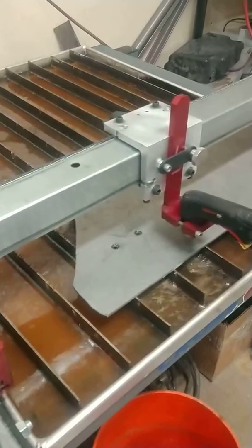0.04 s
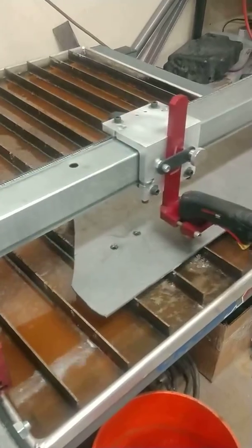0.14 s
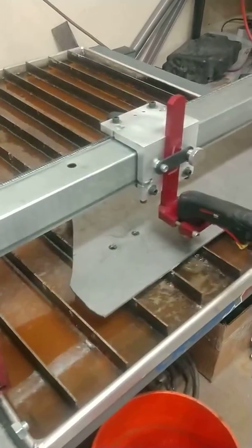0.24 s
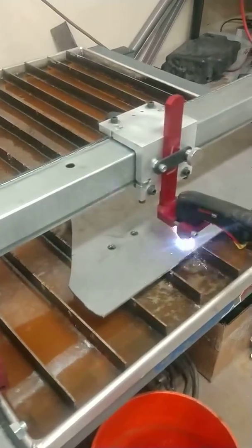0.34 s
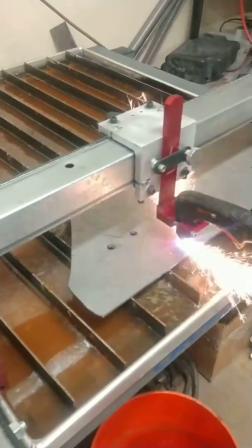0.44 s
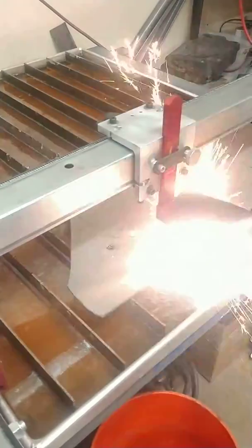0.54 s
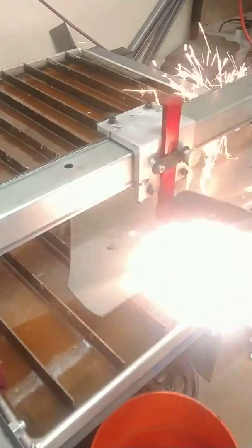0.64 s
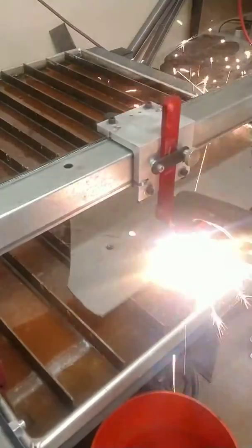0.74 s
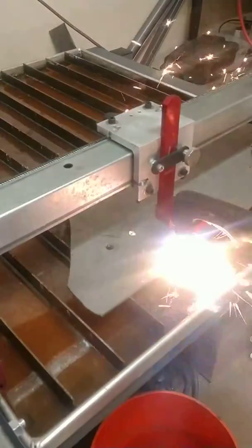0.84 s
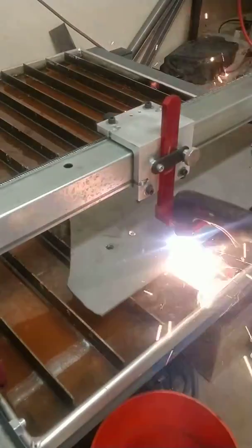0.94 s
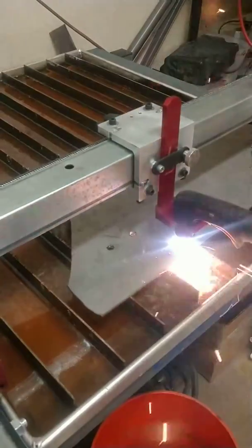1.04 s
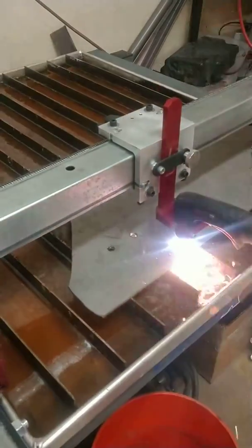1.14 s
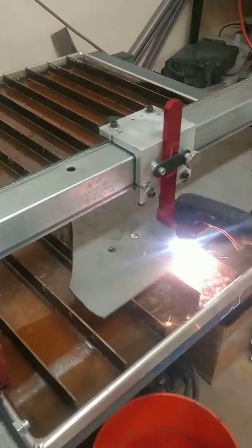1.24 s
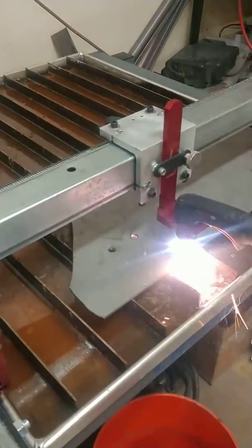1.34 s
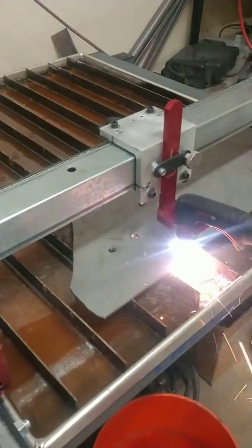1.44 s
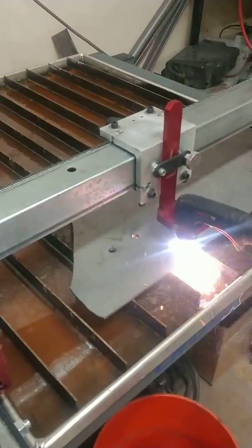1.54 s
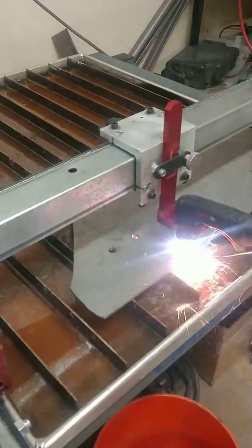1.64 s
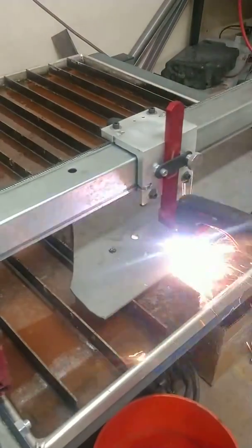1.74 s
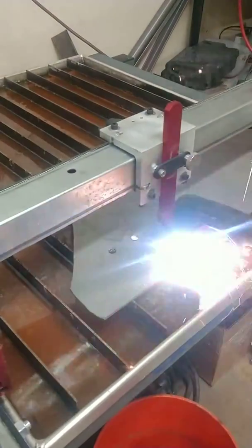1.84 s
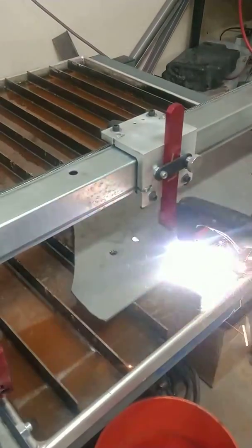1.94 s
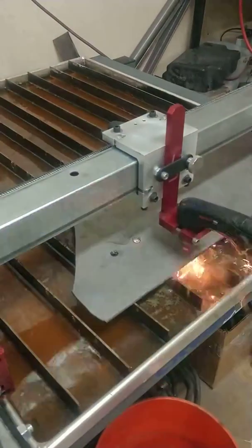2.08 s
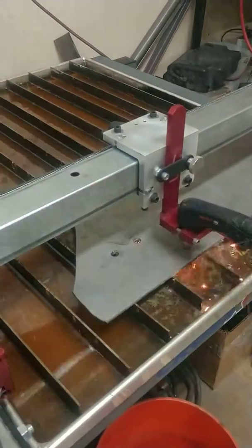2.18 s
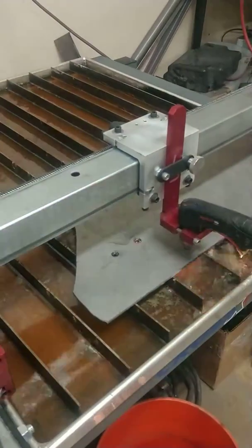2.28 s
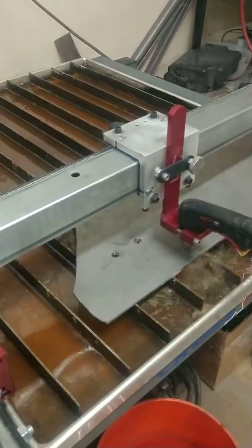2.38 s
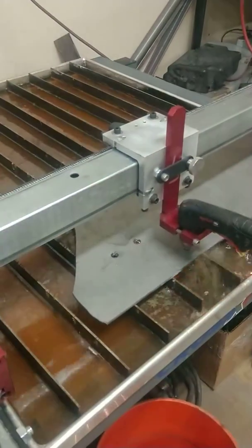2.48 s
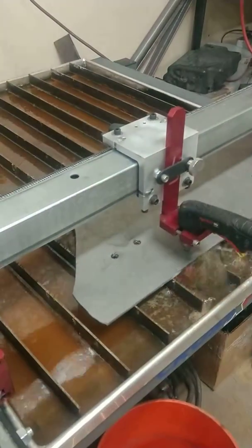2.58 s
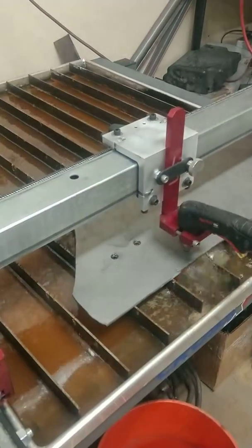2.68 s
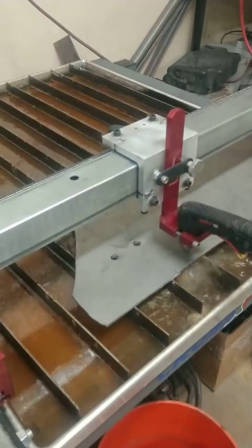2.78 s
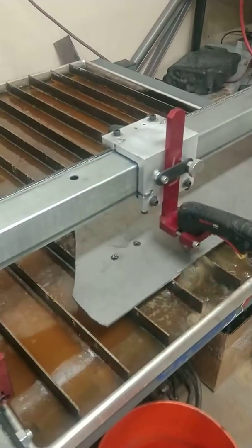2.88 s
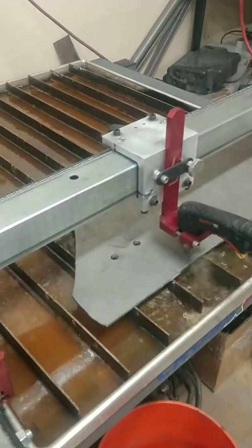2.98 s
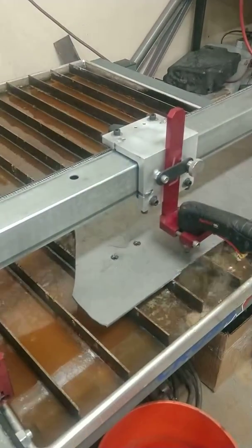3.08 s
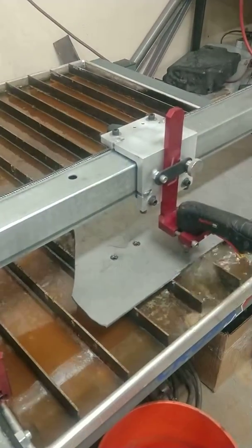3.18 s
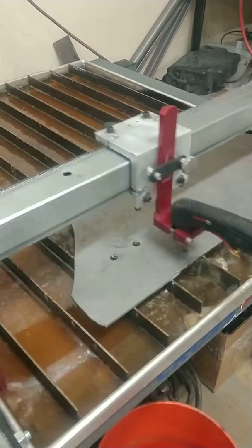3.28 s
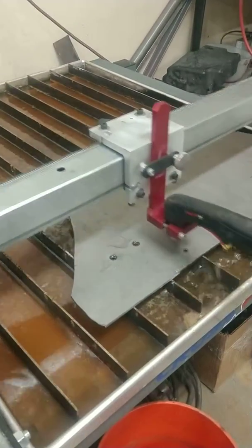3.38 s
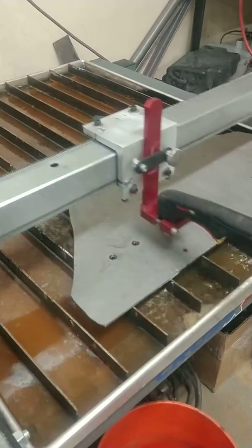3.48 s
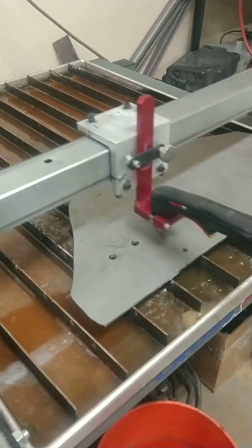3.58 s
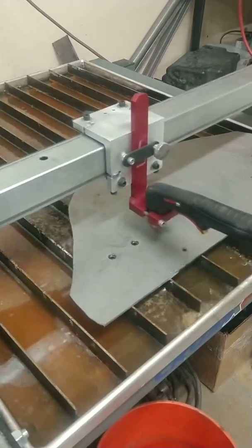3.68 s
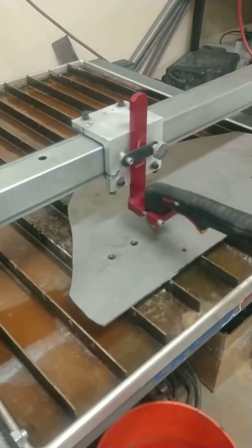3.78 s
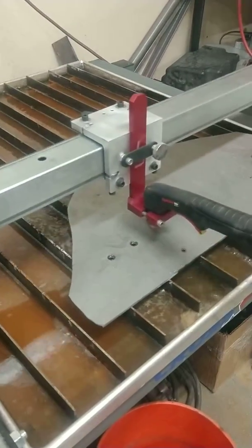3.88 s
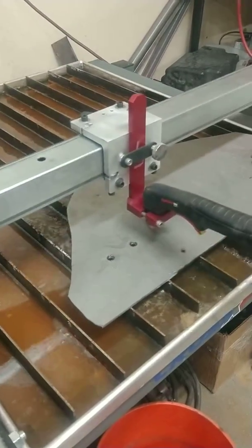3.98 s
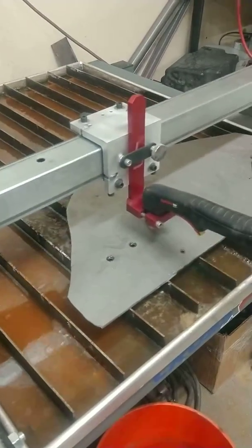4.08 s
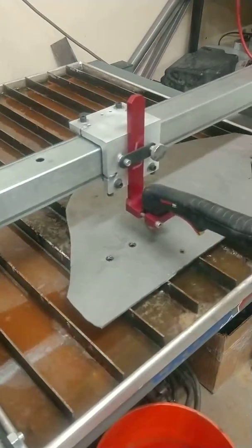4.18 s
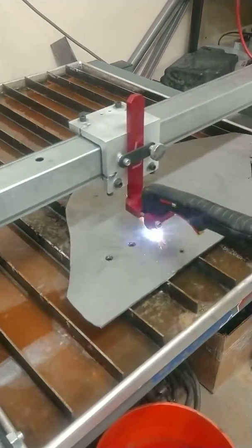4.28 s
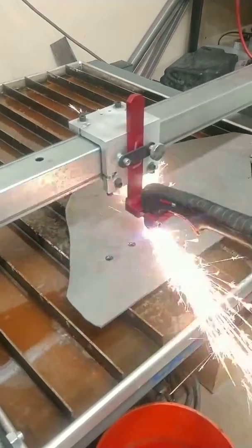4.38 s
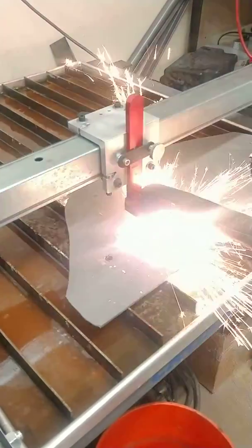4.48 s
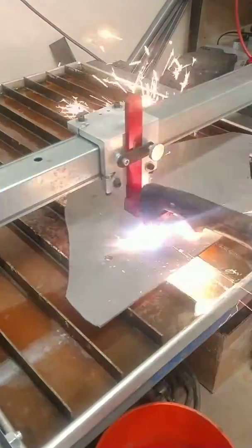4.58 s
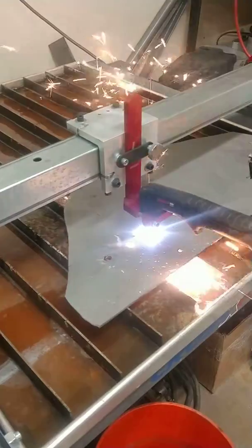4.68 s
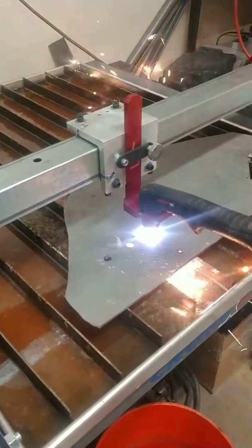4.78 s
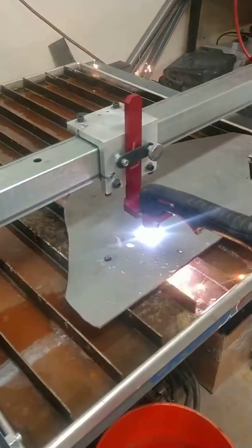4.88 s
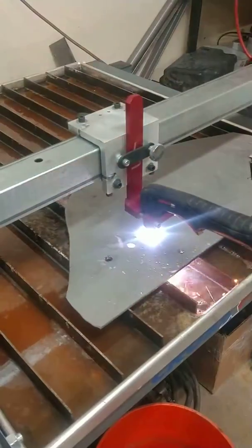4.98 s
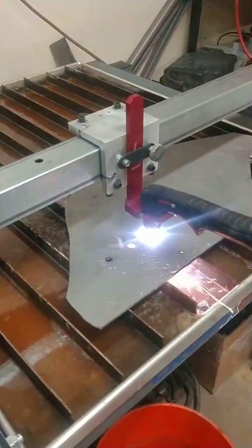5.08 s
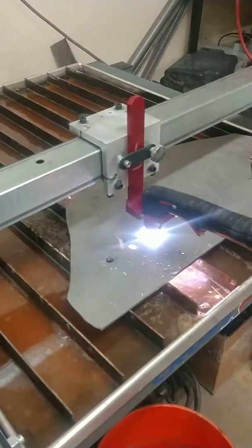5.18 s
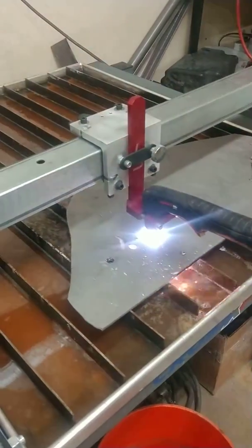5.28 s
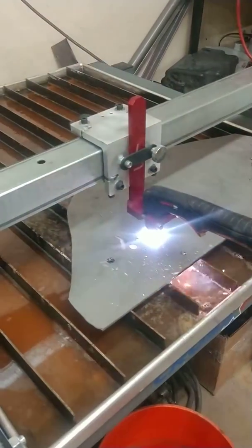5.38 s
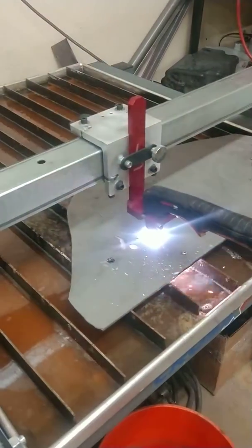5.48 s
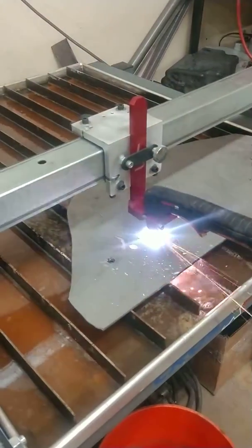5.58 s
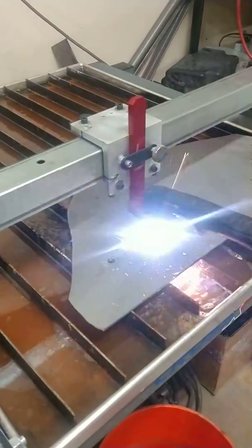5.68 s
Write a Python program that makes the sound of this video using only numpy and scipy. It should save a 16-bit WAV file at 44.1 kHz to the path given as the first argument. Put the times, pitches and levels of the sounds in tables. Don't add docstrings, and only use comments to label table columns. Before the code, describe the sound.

A plasma torch works over a water-filled cutting table, heard close in stereo in a workshop. Bright air hiss opens the scene and bleeds away from about 0.15 s, with a soft gulp, leaving low fan rumble, faint hiss and wavering mains hum. A valve ticks at 0.44 s; the arc cracks on at 0.49 s with a burst of spray and a tiny rising whistle. A lumpy low roar and sizzling hiss continue, the water churning into ringing gurgles from about 1.1 s, with a loud gulp at 1.27 s and a smaller one at 1.5 s. At 2.18 s the arc snaps out. Air blows on, bubbling until about 3.4 s, then hissing more cleanly until it shuts off at 4.08 s with small gulps. A tick at 4.38 s and a crack at 4.43 s start the second whistle and roar. Strong, hollow, pitched gurgling surges from 5 s onward, still cutting at the end.

```python
import sys
import numpy as np
from scipy import signal
from scipy.fft import rfft
from scipy.io import wavfile
from scipy.ndimage import uniform_filter1d

SR = 44100
rng = np.random.default_rng(int(sys.argv[2]) if len(sys.argv) > 2 else 0)


def natural_amplitude(level_db):
    exponent = np.asarray(level_db, float) / 20
    return 10 ** exponent


def pcm_store(signal):
    levels = np.round(np.clip(np.atleast_2d(signal), -1, 1) * 32767)
    wavfile.write(sys.argv[1], SR, levels.astype(np.int16).T)


N = 252693

# start_s [s], peak_db [dB], length_ms [ms]
ARC_CRACKS = [
    (0.4882, -10, 1),
    (2.182, -5, 0.44),
    (4.4283, -9.5, 0.95),
]


def evened(x):
    return x / np.sqrt(np.mean(x ** 2) + 1e-20)


def read(points, hz, col=1):
    table = np.array(points)
    return np.interp(np.log(hz + 1), np.log(table[:, 0] + 1), table[:, col])


def add(mix, start_s, sound):
    part = mix[round(start_s * SR):][:len(sound)]
    part += sound[:len(part)]


def band_even(x, lo_hz, hi_hz):
    hz = np.fft.rfftfreq(len(x), 1 / SR)
    band = rfft(x)[(hz > lo_hz) & (hz < hi_hz)]
    return x * len(x) / np.sqrt(2 * np.sum(abs(band) ** 2))


def smooth_patches(noise, bins, frames):
    return evened(uniform_filter1d(uniform_filter1d(noise, size=bins, axis=0), size=frames, axis=1))


def rush(spectrum, patchy_db, flicker_db, size):
    frames, hz = 4 * N // size + 5, np.fft.rfftfreq(size, 1 / SR)
    a, b, patch = rng.standard_normal((frames, len(hz), 3)).T
    patch = smooth_patches(patch, bins=size // 64, frames=8192 // size)
    flicker = evened(uniform_filter1d(rng.standard_normal(frames), size=3))
    level_db = read(spectrum, hz)[:, None] + patchy_db * patch + flicker_db * flicker
    return signal.istft((a + 1j * b) * natural_amplitude(level_db), nperseg=size, noverlap=size * 3 // 4)[1][:N]


def resonate(x, hz, width):
    turn = np.exp(2j * np.pi * np.cumsum(hz) / SR)
    r = np.exp(-np.pi * width / SR)
    return 2 * (turn * signal.lfilter([1 - r], [1, -r], x / turn)).real


def control(name):
    # start_s [s], air_db [dB], spray_db [dB above the air], churn_db [dB]
    phases = [
        [(0.0, -27, -18, -44), (0.15, -31, -33, -70)],
        [(0.489, -27, -13, -46), (0.85, -28, -11, -43.5), (1.085, -27.5, -9, -31), (1.19, -29, -13.5, -30),
         (1.35, -27, -12, -34), (1.6, -28, -12.5, -30), (1.8, -25.5, -7, -29.5), (1.98, -25.5, -11.5, -28.5),
         (2.178, -22.5, -16.5, -27)],
        [(2.198, -32, -13, -32.5), (2.45, -31.5, -19, -42.5), (2.63, -28, -16, -40.5),
         (2.93, -27, -16.5, -38.5), (3.05, -27, -11.5, -32), (3.3, -27, -16, -37), (3.45, -28, -21, -45.5),
         (3.55, -28, -23.5, -46), (4.09, -27.5, -23, -52)],
        [(4.428, -30, -11.5, -43), (4.7, -29.5, -9.5, -38.5), (4.85, -28.5, -11.5, -34),
         (5.05, -27.5, -12, -31.5), (5.18, -23.5, -12.5, -30.5), (5.37, -28.5, -13.5, -26),
         (5.6, -28.5, -11.5, -28), (5.73, -30, -9, -24.5)],
    ]
    # valve_shuts_s [s], valve_opens_s [s], arc_strikes_s [s]
    pauses = [
        (0.151, 0.441, .488),
        (4.083, 4.38, 4.427),
    ]
    # strike_s [s], end_s [s], pierce_strength [factor], cavity share between surges, rest_share [0-1]
    cuts = [
        (0.49, 2.188, 1, 0.04),
        (4.429, 6, 1.04, 0.43),
    ]
    # centre_s [s], lift_db [dB], cavity_hz [Hz], cavity_share [0-1]
    surge_rows = np.array([(.14, 21, 520, .6), (.62, 3.5, 830, 0.6), (1.09, 0, 1067, .3),
                           (1.189, 1, 860, 0.04), (1.271, 5, 1110, 0.36), (1.455, 8.5, 1100, 0.7),
                           (1.559, 10.5, 824, 0.65), (1.7, 2, 783, 0.3), (1.83, 2, 1004, 0.5),
                           (2.03, 4, 854, .1), (2.179, 8, 928, 0.23), (2.41, 5.5, 404, 0.5),
                           (2.54, 8, 745, 0.6), (2.6, 6, 960, .55), (2.76, 7, 866, 0.3),
                           (2.815, 4, 465, 0.65), (2.99, 9.5, 770, 0.13), (3.13, 1.5, 970, .1),
                           (3.199, 9.5, 478, 0.3), (3.31, 7, 420, 0.3), (4.506, 6.5, 1006, 0.12),
                           (4.72, -0.5, 680, 0.7), (4.87, 0.5, 663, .95), (4.991, 13, 666, 0.8),
                           (5.098, 7.5, 593, 0.97), (5.27, 4.5, 615, 0.6), (5.454, 9.5, 519, 0.48),
                           (5.539, 11, 509, 0.72), (5.638, 9, 625, 0.56), (5.73, 3.5, 613, .66)])

    t = np.arange(0, N + 64, 64) / SR
    rows = np.concatenate(phases)
    air, spray, churn = (np.interp(t, rows[:, 0], col) for col in rows.T[1:])
    surge_s = 0.025
    swells = np.exp(-.5 * ((t[:, None] - surge_rows[:, 0]) / surge_s) ** 2)
    surge = (swells * surge_rows[:, 1]).sum(axis=1)

    pierce_s, idle_share = 0.095, 0.36
    pierce, lit, calm = 0, False, idle_share
    for strike, end, strength, rest_share in cuts:
        age = np.maximum(t - strike, 0) / pierce_s
        pierce = pierce + strength * age * np.exp(1 - age)
        burns = (t >= strike) & (t < end)
        lit = lit | burns
        calm = calm + burns * (rest_share - idle_share)
    spray = air + spray + 8 * pierce + 0.34 * surge
    air = air + 0.045 * surge
    churn = churn + 12.5 * pierce + surge

    roar_db, spray_rest_db, idle_roar_db = -45, -37.5, -60.5
    burning = roar_db + 0.99 * (spray - spray_rest_db) + 3 * pierce
    roar = np.where(lit, burning, idle_roar_db)

    bleed_db_per_s, bleed_knee_s = 225, 0.061
    puff_db, puff_s = 12, 0.032
    pilot_db, pilot_dip_db, pilot_s, pilot_spray_db = -44.5, 8, 0.014, -61.5
    still_db, knock_db, knock_s = -66, 27, 0.012
    for shut, opens, strike in pauses:
        empty, pilot = (t >= shut) & (t < opens), (t >= opens) & (t < strike)
        air_held, spray_held, churn_held = [np.interp(shut, t, level) for level in (air, spray, churn)]
        bleed = bleed_db_per_s * (np.hypot(t - shut, bleed_knee_s) - bleed_knee_s)
        age = abs(t - opens)
        creep = pilot_db - pilot_dip_db * np.exp(-age / pilot_s)
        knock = still_db + knock_db * np.exp(-age / knock_s)
        air = np.select([empty, pilot], [air_held - bleed, creep], air)
        spray = np.select([empty, pilot], [spray_held - 0.78 * bleed, pilot_spray_db], spray)
        churn = np.select([empty, pilot], [churn_held - 0.93 * bleed, knock], churn)
        roar = roar + puff_db * np.exp(-.5 * ((t - shut) / puff_s) ** 2)

    share = calm + (swells * (surge_rows[:, 3] - np.reshape(calm, (-1, 1)))).sum(axis=1)
    hz = np.interp(t, surge_rows[:, 0], surge_rows[:, 2])
    curves = dict(air=air, spray=spray, roar=roar, churn=churn, hz=hz, share=share)
    return np.interp(np.arange(N) / SR, t, curves[name])


def jet():
    # pitch_hz [Hz], level_db [dB]
    hiss_colour = [(300, -11.5), (2000, -27.5), (5000, -10.5), (7000, -6.5), (10000, -5), (13000, -3.5),
                   (15000, -1), (15700, 1)]
    # pitch_hz [Hz], level_db [dB]
    spray_colour = [(500, -15), (1200, 4), (2000, 2), (3200, -5), (5000, -0.5), (8000, -11), (15000, -38)]
    hiss = band_even(rush(hiss_colour, patchy_db=2.0, flicker_db=0.64, size=256), 5200, 15770)
    spray = band_even(rush(spray_colour, patchy_db=2.0, flicker_db=1.4, size=256), 1975, 4980)
    return natural_amplitude(control("air") + 3.0) * hiss + natural_amplitude(control("spray") + 2.5) * spray


def arc():
    # pitch_hz [Hz], level_db [dB]
    roar_colour = [(25, -40), (60, -11), (110, 2), (170, 0.5), (300, -3.5), (600, -5.5), (1200, -19.5),
                   (2500, -17.5), (6000, -24)]
    roar = band_even(rush(roar_colour, patchy_db=1.5, flicker_db=2.5, size=512), 110, 358)
    return natural_amplitude(control("roar") + 8.5) * roar


def bubbles(per_s, spread_db, cycles):
    born = rng.random(N) < per_s / SR
    size = natural_amplitude(spread_db * np.minimum(rng.exponential(1, N), 4)) * born
    kind = rng.integers(0, 24, N)
    out = np.zeros(N)
    for k, hz in enumerate(np.geomspace(420, 1220, num=24)):
        turns = np.arange(1500) / SR * hz
        ring = np.sin(2 * np.pi * (turns + .012 * turns ** 2)) * turns * np.exp(-3 * turns / cycles)
        out += signal.oaconvolve(size * (kind == k), ring / np.linalg.norm(ring))[:N]
    return evened(out)


def water():
    # pitch_hz [Hz], width_hz [Hz], level_db [dB]
    tray_rings = [(443, 19, 4), (582.3, 8.6, 1.5), (621, 90, -13), (850, 190, -12), (1105, 10, 7.5),
                  (1183, 39, -5.5)]
    lumps = evened(uniform_filter1d(rng.standard_normal(N), size=500))
    churn = rng.standard_normal(N) * natural_amplitude(2.9 * lumps)
    cavity_hz = control("hz")
    cavity = evened(resonate(resonate(churn, cavity_hz, width=45), cavity_hz, width=140))
    hold = 0.54
    cavity = evened(cavity / abs(uniform_filter1d(cavity ** 2, size=600) + .02) ** (hold / 2))
    loose = bubbles(per_s=900, spread_db=2.5, cycles=5.6)
    tray = sum(natural_amplitude(db) * resonate(loose, np.full(N, hz), width) for hz, width, db in tray_rings)
    loose = evened(loose + tray)
    share = np.clip(control("share"), 0, 1)
    return natural_amplitude(control("churn") - 1.5) * (np.sqrt(share) * cavity + np.sqrt(1 - share) * loose)


def strikes():
    # start_s [s], peak_db [dB], ring_hz [Hz]
    valve_ticks = [
        (.437, -46, 10500),
        (.4428, -29, 3600),
        (.4475, -41, 4000),
        (4.378, -46, 11000),
        (4.384, -30, 4300),
        (4.388, -39, 4000),
        (4.394, -43, 4000),
    ]
    out, t = np.zeros(N), np.arange(1500) / SR
    for start_s, db, ms in ARC_CRACKS:
        u = t / (ms / 1000)
        push = 0.69 * (1 - u) * np.exp(-u)
        buzz = 2.5 * np.cos(2 * np.pi * 14500 * t) * np.exp(-t / 0.0002)
        add(out, start_s, natural_amplitude(db) * (push + buzz))
    for start_s, db, hz in valve_ticks:
        rattle = evened(resonate(rng.standard_normal(len(t)), np.full(len(t), hz), width=4000))
        ring = np.sin(2 * np.pi * hz * t) + .7 * rattle
        add(out, start_s, natural_amplitude(db) * ring * np.exp(-t / 0.00034))
    return out


def nozzle():
    # start_s [s], level_db [dB], from_hz [Hz], to_hz [Hz], length_s [s]
    whistles = [
        (.498, -24.5, 4900, 5700, .05),
        (4.442, -24, 5100, 6000, .065),
    ]
    out = np.zeros(N)
    for start_s, db, from_hz, to_hz, length in whistles:
        t = np.arange(0, length, 1 / SR)
        air = rng.standard_normal(len(t))
        hz = from_hz + (to_hz - from_hz) * t / length
        overtones = zip((1, 2, 3), (0, -4, 0))
        tones = sum(natural_amplitude(up_db) * resonate(air, k * hz, width=300 * k) for k, up_db in overtones)
        add(out, start_s, natural_amplitude(db) * evened(tones) * np.sin(np.pi * np.sqrt(t / length)))
    return out


def gulps():
    # start_s [s], peak_db [dB], pitch_hz [Hz; negative pulls first]
    pockets = [
        (.1315, -36, -170),
        (1.267, -14, 160),
        (1.497, -22, 200),
        (4.071, -35, 230),
        (4.08, -37, 130),
    ]
    out = np.zeros(N)
    for start_s, db, hz in pockets:
        turn = np.arange(0, 1.5, abs(hz) / SR)
        swing = np.sin(2 * np.pi * turn) * np.sin(np.pi * turn / 1.5)
        add(out, start_s, np.sign(hz) * natural_amplitude(db) * swing)
    return out


def ports(x, scatter):
    # pitch_hz [Hz], right_port_db [dB], phase scatter of the difference, scatter_rad [rad]
    port_rows = [(60, -2.5, .1), (150, -1, 0.24), (330, -3.5, 1.5), (1140, 0, 4), (2270, 0, 0.95),
                 (3500, 0.1, 0.76), (5300, -4, 5), (7250, -5.5, 3), (9700, -6.5, 4.8), (11400, -1.5, 0.46),
                 (15300, 1, 0.54)]
    # pitch_hz [Hz], lag_us [microseconds]
    lag_rows = [(175, 435), (350, 540), (700, 500), (2250, 446), (4470, 447), (6900, 435), (10550, 427),
                (15200, 427)]
    hz, t, z = signal.stft(x, SR, nperseg=1024, noverlap=768)
    column_hz = hz[:, None]
    swirl, drift, grain = rng.standard_normal((len(t), len(hz), 3)).T
    swirl = smooth_patches(swirl, bins=5, frames=9)
    drift = smooth_patches(drift, bins=30, frames=20)
    grain = smooth_patches(grain, bins=2, frames=4)
    strike_times = (ARC_CRACKS[0][0], ARC_CRACKS[2][0])
    fresh = sum((t > s) * np.minimum(1.6 * np.exp(-abs(t - s) / .2), 1) for s in strike_times)
    air_db = np.interp(t * SR, np.arange(N), control("air"))
    lull = 4 * np.clip((-33 - air_db) / 12, 0, 1)
    wander = lull * grain * (column_hz > 3000)
    wander = wander + 0.11 * drift * np.minimum(column_hz / 2000, 1)
    wander = wander + 1.96 * grain * np.sqrt(column_hz / 15000)
    spread = scatter * (1 - fresh) * wander
    lag_s = read(lag_rows, hz) / 1e6
    balance = natural_amplitude(read(port_rows, hz)[:, None] * (1.5 - fresh))
    right = -balance * np.exp(1j * (spread - 2 * np.pi * (hz * lag_s)[:, None]))
    mid = (1 + right) / 2
    side = (1 - right) / 2 * np.exp(1j * scatter * read(port_rows, hz, col=2)[:, None] * swirl)
    return signal.istft(z * np.array([mid + side, mid - side]), SR, nperseg=1024, noverlap=768)[1][:, :N]


def room(x):
    # pitch_hz [Hz], time to fall 60 dB, fade_s [s]
    fade_times = [(100, 0.19), (1000, 0.18), (5000, 0.72), (15000, 0.11)]
    taps = np.zeros((2, SR // 2))
    at = np.arange(200, SR // 2 - 20, 20)
    at = at + rng.integers(0, 20, (2, len(at)))
    np.put_along_axis(taps, at, rng.choice([-1., 1.], at.shape), 1)
    hz, t, z = signal.stft(taps, SR, nperseg=256)
    tail = signal.istft(z * natural_amplitude(-60 * t / read(fade_times, hz)[:, None]), SR, nperseg=256)[1]
    return signal.fftconvolve(x[None], tail / np.linalg.norm(tail[0]), axes=1)[:, :N]


def fan():
    # pitch_hz [Hz], level_db [dB]
    fan_colour = [(25, -44), (45, -24), (70, -1), (120, -4), (300, -14), (800, -10), (2000, -44),
                  (6000, -50)]
    return natural_amplitude(-56.5) * evened(rush(fan_colour, patchy_db=2.5, flicker_db=2.5, size=1024))


def shop():
    # pitch_hz [Hz], level_db [dB]
    far_colour = [(200, -3), (800, -12), (2500, -5), (5000, -4), (15000, -12)]
    # pitch_hz [Hz], level_db [dB rms], right_gain [factor at the right port]
    hum_tones = [(88, -76, -0.21), (117.8, -56, 0.66), (178.8, -51, 0.28), (233, -59, 0.98),
                 (460, -55, 0.34), (470, -67, 0.12)]
    t = np.arange(N) / SR
    hiss = [evened(rush(far_colour, patchy_db=1.0, flicker_db=.5, size=256)) for port in "LR"]
    out = natural_amplitude(-64) * np.array(hiss)
    for hz, db, right_gain in hum_tones:
        waver = evened(uniform_filter1d(rng.standard_normal(N), size=6000))
        tone = natural_amplitude(db - 2.5 + 0.52 * waver) * np.sin(2 * np.pi * (hz * t + rng.random() + 0.033 * waver))
        out = out + np.outer([1, right_gain], tone)
    return out


def scene():
    flow = jet() + arc() + water() + nozzle() + fan()
    sharp = strikes() + gulps()
    direct = ports(flow, scatter=0.34) + ports(sharp, scatter=0)
    return direct + natural_amplitude(-16.5) * room(flow + sharp) + shop()


def low_pass(x):
    return signal.sosfilt(signal.butter(12, 17100, fs=SR, output="sos"), x)


def record(dry):
    bass_cut = signal.sosfilt(signal.butter(3, 55, "high", fs=SR, output="sos"), dry)
    edge = signal.firwin(2047, 15745, window=("kaiser", 10), fs=SR)
    return low_pass(signal.oaconvolve(bass_cut, edge[None], "same"))


dry = scene()
out = record(dry)
pcm_store(out)
```